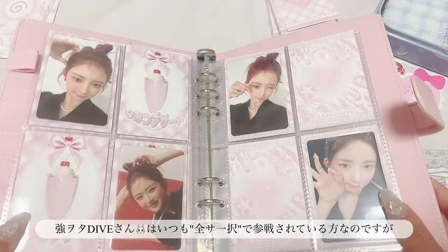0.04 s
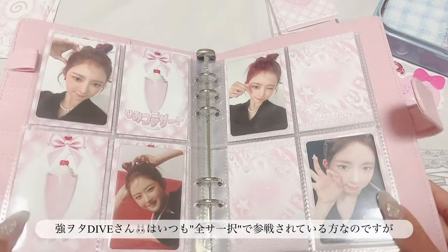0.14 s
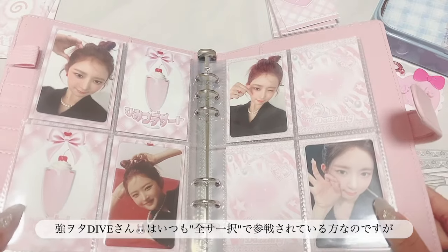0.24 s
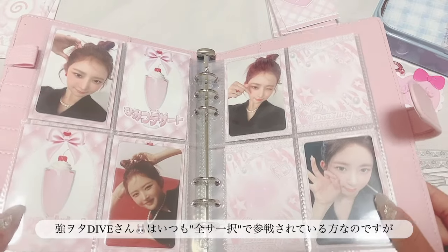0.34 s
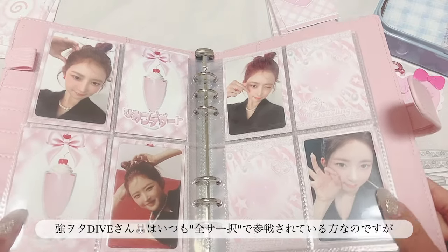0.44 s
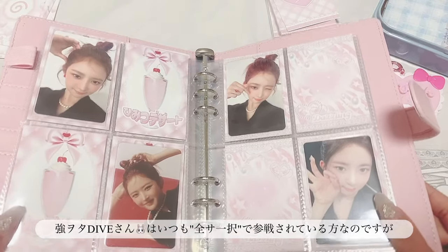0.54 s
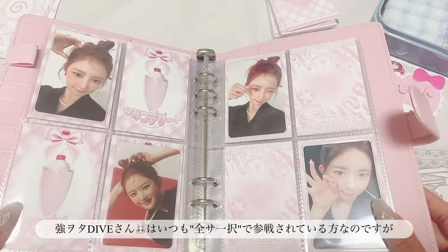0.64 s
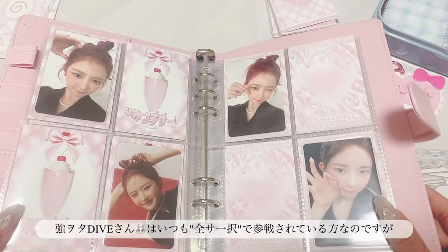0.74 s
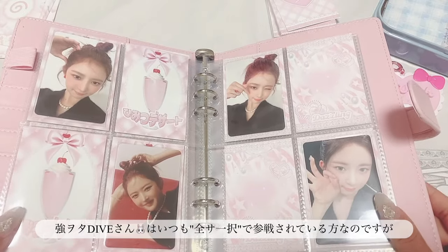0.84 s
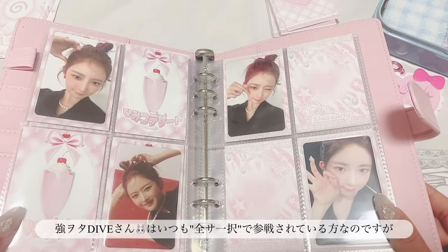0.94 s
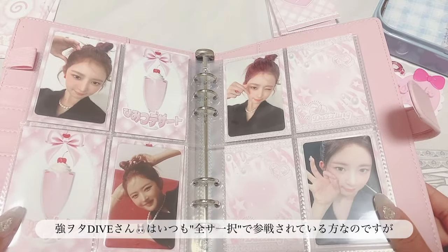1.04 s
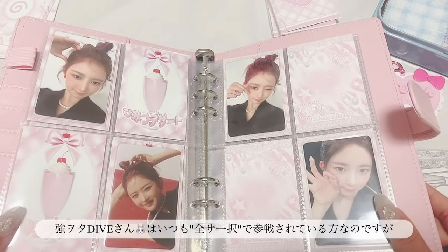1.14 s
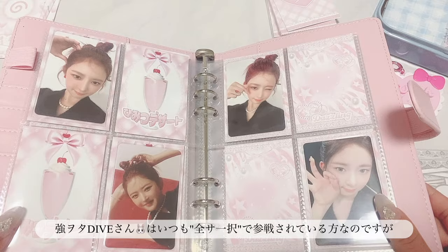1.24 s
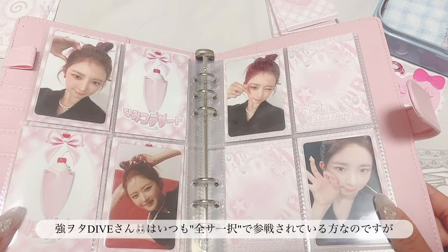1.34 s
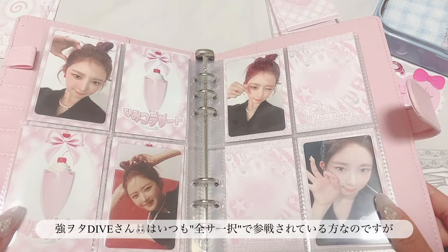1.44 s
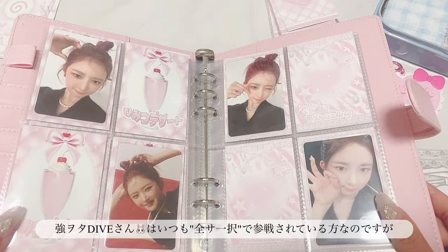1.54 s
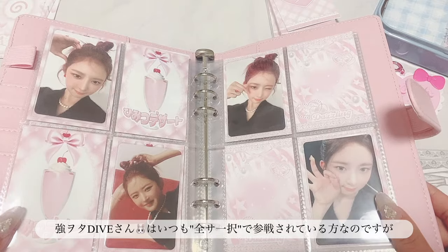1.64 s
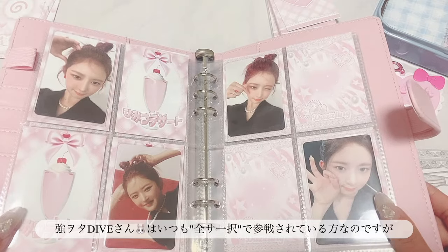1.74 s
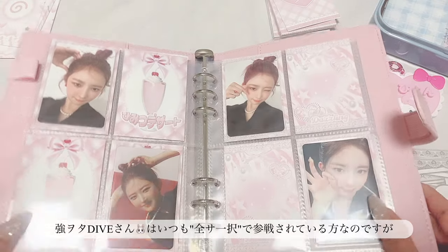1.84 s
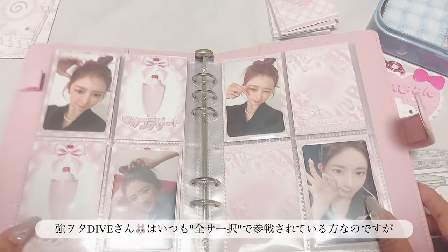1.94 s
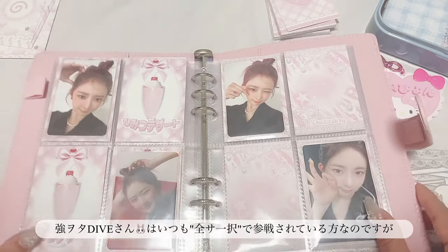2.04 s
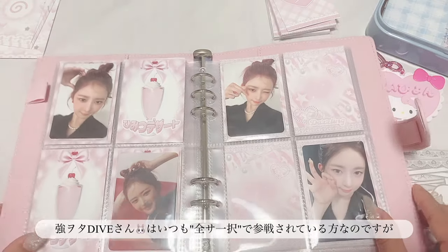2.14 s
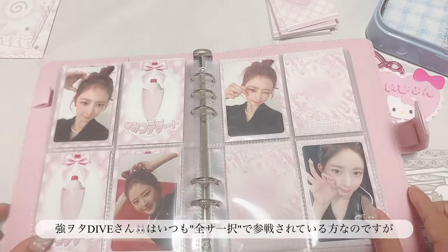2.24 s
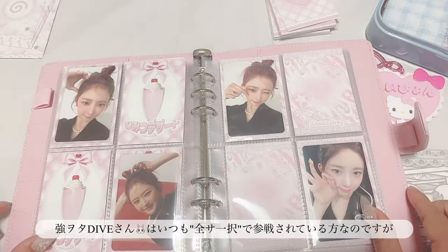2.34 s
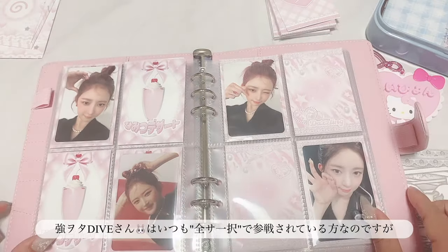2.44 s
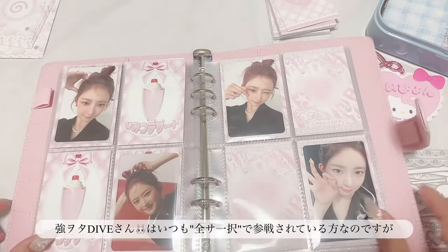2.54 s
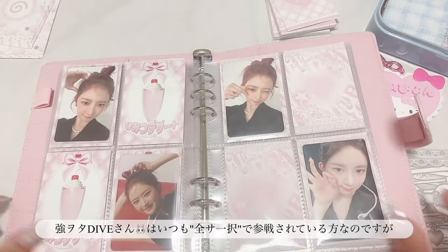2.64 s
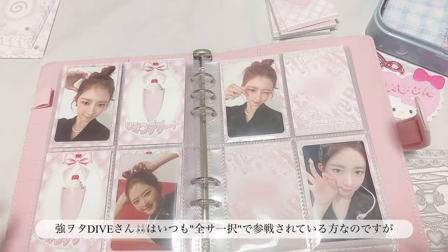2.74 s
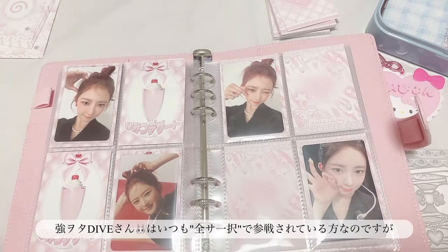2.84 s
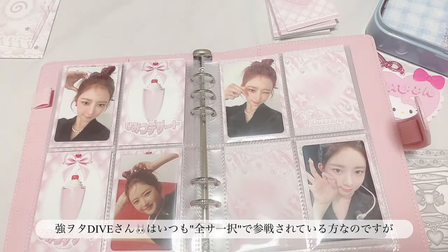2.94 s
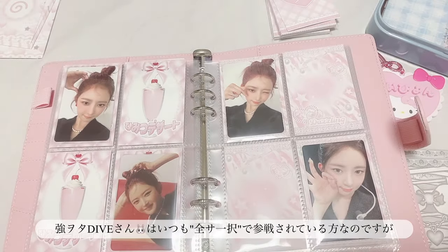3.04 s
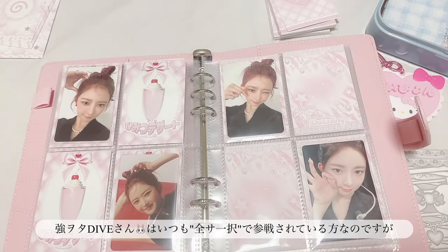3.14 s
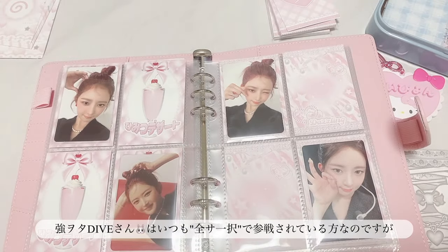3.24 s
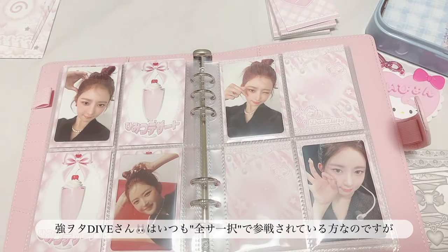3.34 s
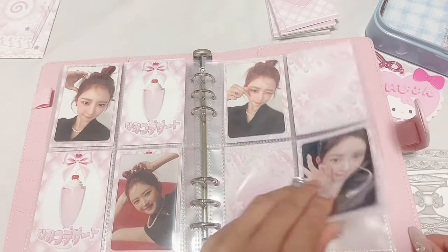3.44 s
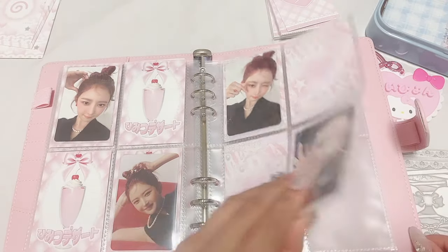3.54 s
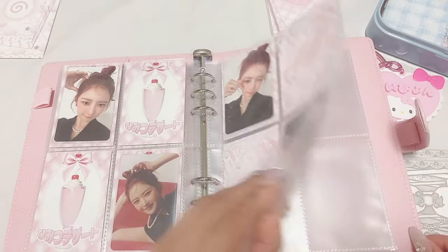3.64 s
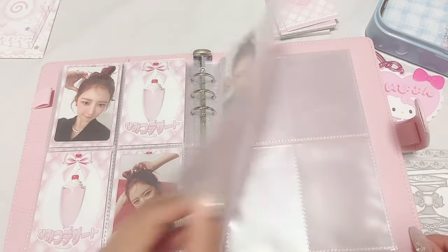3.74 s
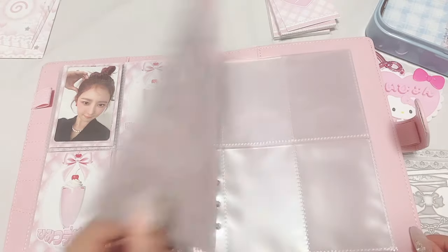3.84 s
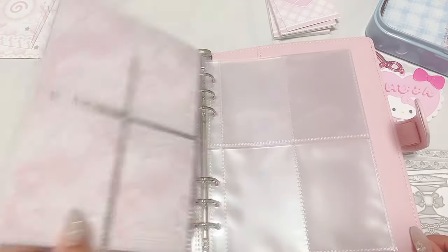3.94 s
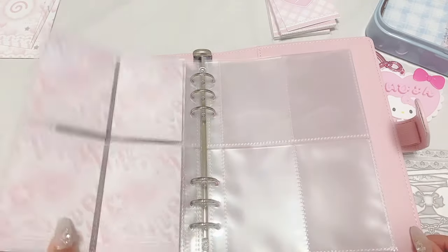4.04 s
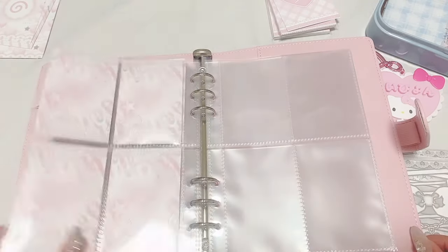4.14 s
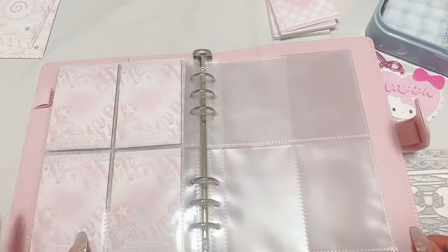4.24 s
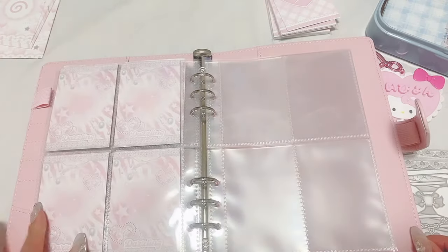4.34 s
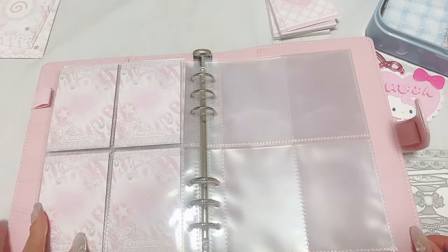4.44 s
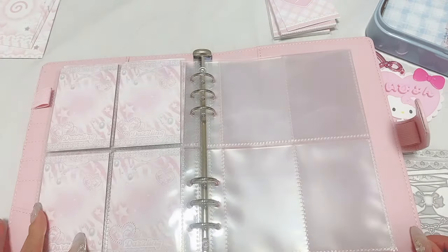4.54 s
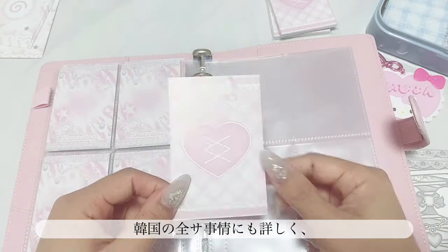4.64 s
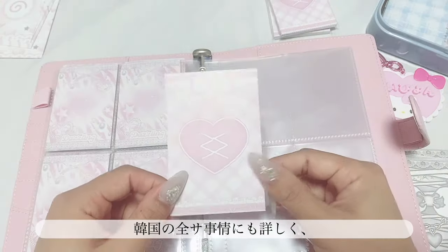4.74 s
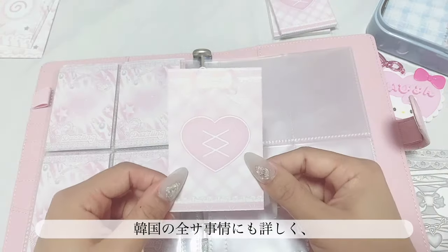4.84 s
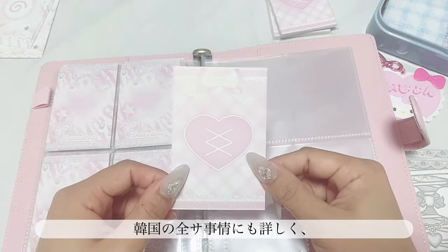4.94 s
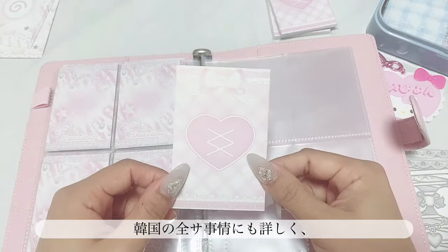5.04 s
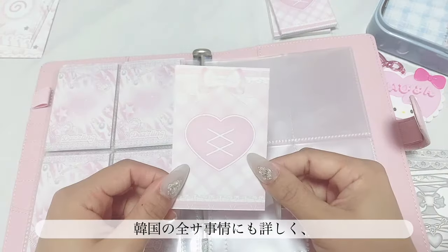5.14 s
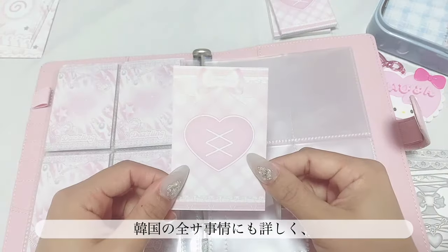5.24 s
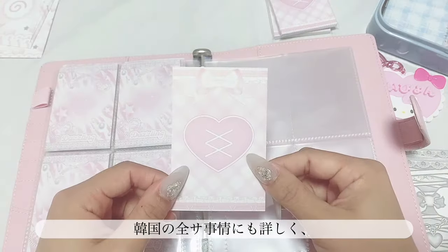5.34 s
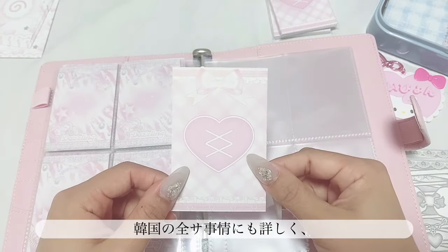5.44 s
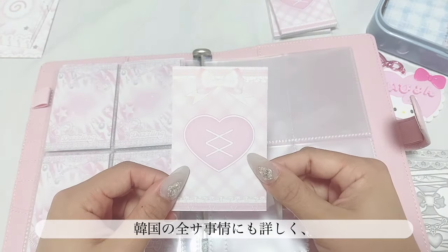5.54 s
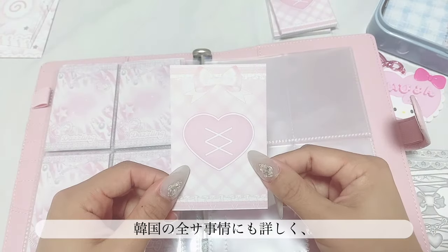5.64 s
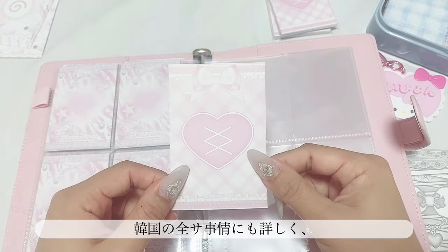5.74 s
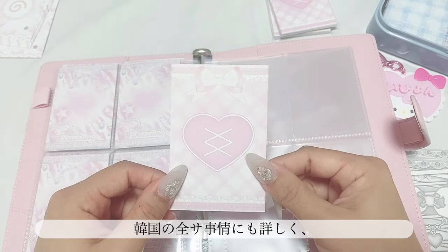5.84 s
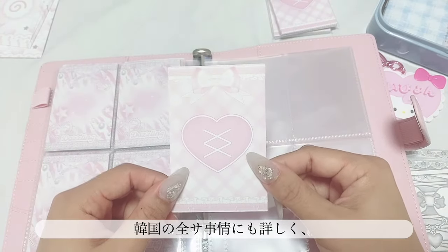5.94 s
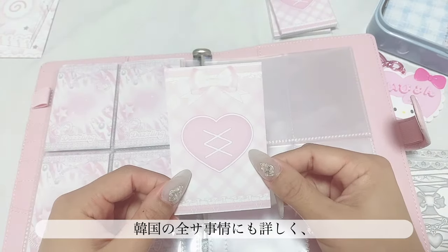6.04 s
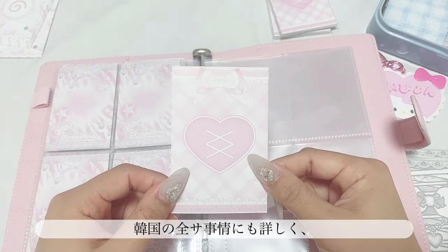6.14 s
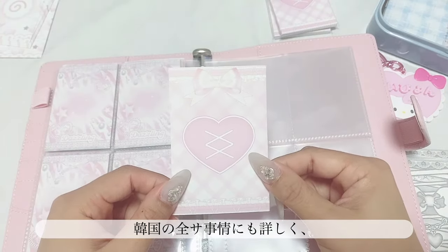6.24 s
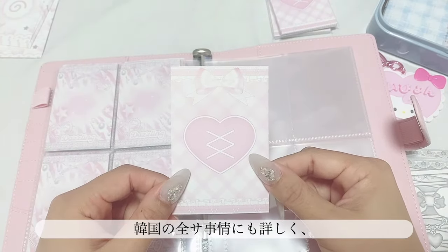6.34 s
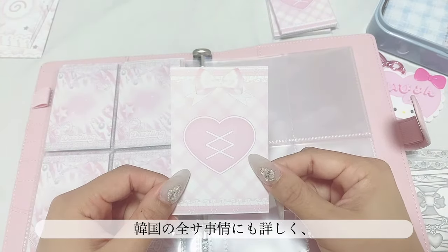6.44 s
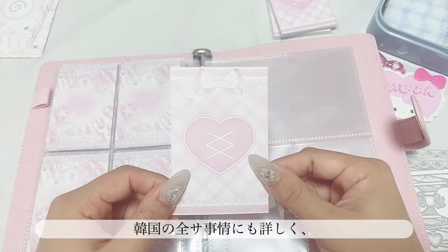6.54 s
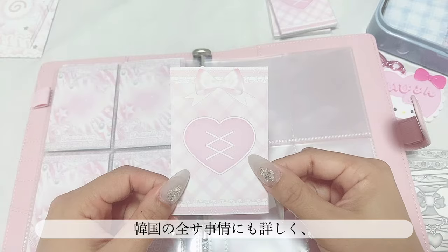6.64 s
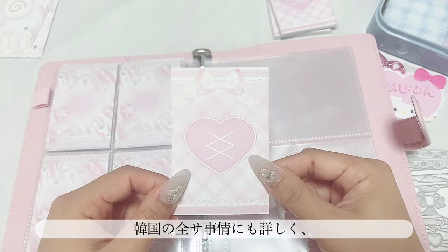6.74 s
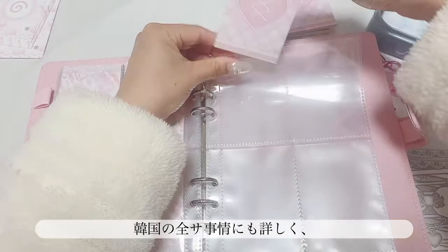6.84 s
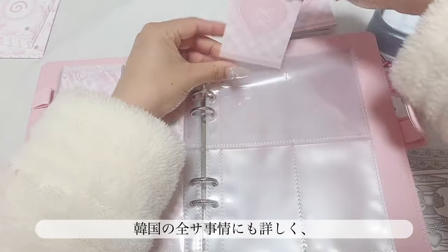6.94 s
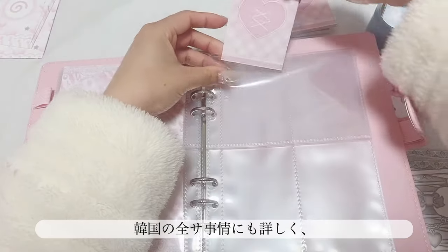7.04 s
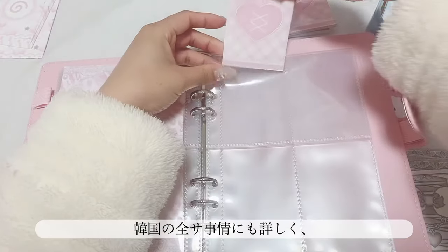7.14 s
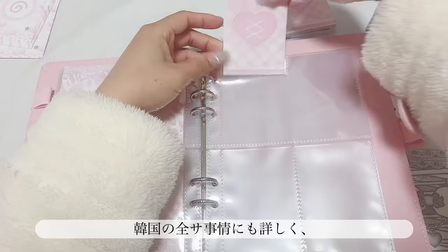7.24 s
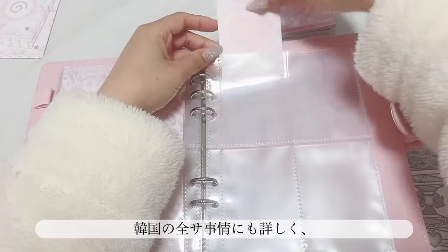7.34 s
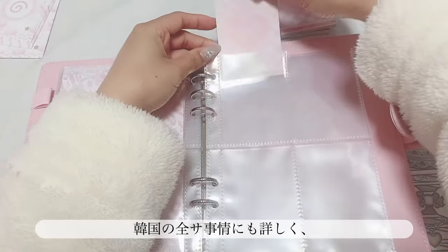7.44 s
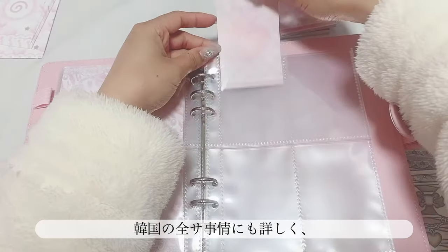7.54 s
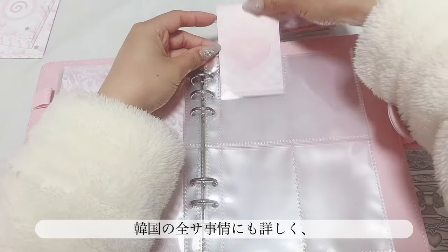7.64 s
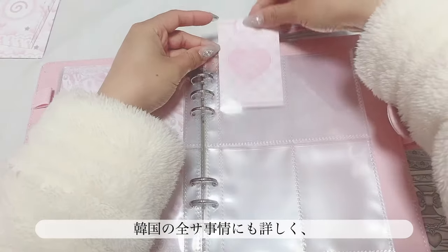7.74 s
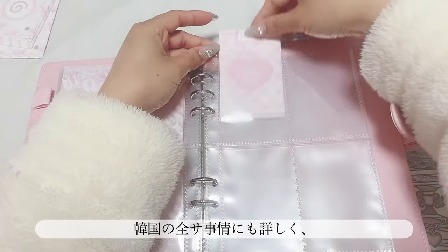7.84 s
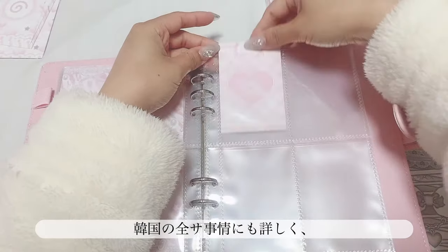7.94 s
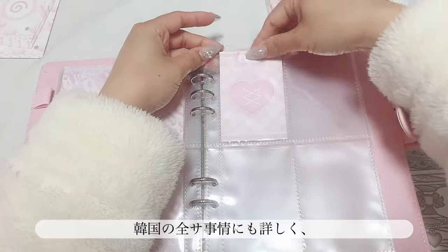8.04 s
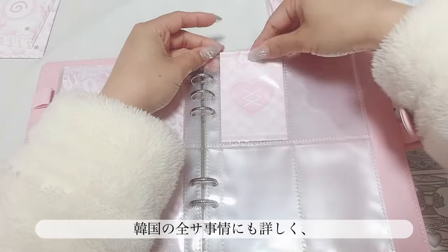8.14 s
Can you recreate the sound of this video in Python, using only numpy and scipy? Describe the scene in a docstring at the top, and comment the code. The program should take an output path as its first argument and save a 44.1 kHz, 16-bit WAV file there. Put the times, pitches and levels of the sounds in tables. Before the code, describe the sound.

Fingers rub plastic film, a page of cards flips with crisp snaps, then a card slides softly into a pocket in a quiet room.

```python
"""A thumb strokes plastic film with a soft hiss: a ring binder of card pockets lies close by on a table
in a small quiet room. Fingers shift the binder, a page full of cards turns with sharp snaps as its film
buckles, then a pocket is picked open and a card slides in. Stick-slip friction makes the hiss, with thin
squeaks on the film; soft knocks send out bending waves. Room noise and a low hum lie underneath."""
import sys
import numpy as np
from scipy import signal
from scipy.fft import rfft, irfft, next_fast_len
from scipy.io import wavfile

SR = 44100
rng = np.random.default_rng(int(sys.argv[2]) if len(sys.argv) > 2 else 0)


def persist_wave(psi):
    """Save psi, clipped to +-1, as 16-bit WAV."""
    counts = np.round(np.clip(psi, -1, 1) * 32767).astype(np.int16)
    wavfile.write(sys.argv[1], SR, np.atleast_2d(counts).T)


N = 361619
TIME = np.arange(N) / SR

# the page is lifted, swung over, dropped and smoothed: t/s, length/s, hiss level/dB, flex level/dB
PAGE_STROKES = [(3.653, 0.036, -43.5, -47.5), (3.764, 0.045, -37.5, -40), (3.851, .03, -45, -53),
                (3.949, 0.073, -44.5, -51.5), (4.078, 0.05, -40, -47), (4.305, .015, -48, -59),
                (4.479, .012, -56, -71)]
PAGE_ATTACK_S, PAGE_T60_S = 0.035, 0.29
# fingers shift the binder: t/s, hiss level/dB, flex level/dB
SHIFT_LEVELS = [(1.70, -68, -78), (1.79, -55.5, -59.5), (2.2, -54.5, -63), (2.26, -52, -56),
                (2.32, -55, -68.5), (2.5, -55.5, -66), (2.6, -51, -63.5), (2.76, -59, -65.5),
                (2.92, -60, -61), (3.05, -62.5, -69), (3.2, -55.5, -65), (3.66, -59, -66)]
# fingers pick the pocket open: t/s, level/dB
PICK_LEVELS = [(6.85, -78), (6.87, -48.5), (6.95, -47), (7.0, -59), (7.07, -62), (7.13, -55.5), (7.31, -46),
               (7.335, -57), (7.41, -49.5), (7.51, -61)]
# the card slides in with two pushes: t/s, hiss level/dB, flex level/dB
SLIDE_LEVELS = [(7.5, -55.5, -59), (7.552, -45, -54), (7.698, -49, -54.5), (7.744, -53, -63),
                (7.908, -44, -55.5), (7.928, -53, -60.5), (8.002, -46.5, -52), (8.038, -74, -81),
                (8.1, -74, -71)]
# spectrum of skin rubbing on film: f/Hz, relative level/dB
FINGER_SPECTRUM = [(5900, -24.5), (7000, -6.5), (8300, -1.5), (9600, 2), (10700, -2.5), (12000, -11),
                   (13200, -11), (14600, -3.5), (16000, -9.5)]


def from_db(db):
    """Amplitude ratio of a level in decibels."""
    return 10 ** (np.asarray(db) / 20)


def rms_one(x):
    """Normalisation to unit rms."""
    return x / np.sqrt(np.mean(x ** 2) + 1e-20)


def add(out, s, sound):
    """Superposition of a sound that starts at time s."""
    start = max(round(s * SR), 0)
    out[start:start + len(sound)] += sound[:max(N - start, 0)]


def level_curve(rows, column):
    """Amplitude envelope interpolated in decibels; silent outside the rows."""
    rows = np.array(rows)
    return from_db(np.interp(TIME, rows[:, 0], rows[:, column], left=-140, right=-140))


def strokes(rows, attack_s, t60, column=2):
    """Amplitude envelope of strokes: each rises linearly, holds, then decays exponentially."""
    gain = 0
    for s, length, db in np.array(rows)[:, [0, 1, column]]:
        rise = np.clip((TIME - s) / attack_s, 0, 1)
        gain = gain + rise * from_db(db - 60 * np.maximum(TIME - s - length, 0) / t60)
    return gain


def drift(rate_hz):
    """Random modulation of unit rms, interpolated between independent values."""
    knots = rng.standard_normal(N // 20)
    return rms_one(np.interp(TIME * rate_hz, np.arange(len(knots)), knots))


def colour(x, spectrum):
    """Spectral shaping by a curve on a log-frequency axis."""
    hz, db = np.transpose(spectrum)
    size = next_fast_len(len(x))
    bins = np.maximum(np.fft.rfftfreq(size, 1 / SR), 1)
    gain_db = np.interp(np.log(bins), np.log(hz), db, left=-70, right=-70)
    return irfft(rfft(x, size) * from_db(gain_db), size)[:len(x)]


def band(x, low_hz, high_hz):
    """Causal band-pass filter."""
    return signal.sosfilt(signal.butter(2, [low_hz, high_hz], "band", fs=SR, output="sos"), x)


def resonate(x, hz, width_hz):
    """Damped two-pole resonator with unit peak gain."""
    r = np.exp(-np.pi * width_hz / SR)
    feedback = [1, -2 * r * np.cos(2 * np.pi * hz / SR), r * r]
    return signal.lfilter(np.array([1, 0, -1]) * (1 - r * r) / 2, feedback, x)


def gliding_ring(hz, width_hz):
    """Noise-driven resonance of unit rms, at a steady or moving frequency."""
    noise = rng.standard_normal(N) + 1j * rng.standard_normal(N)
    swell = signal.sosfilt(signal.butter(2, width_hz / 2, fs=SR, output="sos"), noise)
    carrier = np.exp(2j * np.pi * np.cumsum(hz * np.ones(N)) / SR)
    return rms_one((swell * carrier).real)


def buckling(rows, rise_s=0.0003, flutter_db=-28, flutter_t60=0.028):
    """Impulsive excitation: a brief jolt drives the film's stiff high modes and slower bending waves."""
    out, t = np.zeros(N), np.arange(1024) / SR
    for s, ring_hz, level, bend_hz, bend_db, t60 in rows:
        decay = from_db(-60 * t / t60) + from_db(flutter_db - 60 * t / flutter_t60)
        force = rng.standard_normal((4, len(t))) * np.minimum(t / rise_s, 1) ** 2 * decay
        crack_db = -8.5 + 15.5 * np.log2(ring_hz / 8900)  # a higher ring cracks more
        cards_db = -8.5 - 5 * np.log2(bend_hz / 3600)  # a lower wave shakes the cards more
        parts = [(resonate(band(force[0], 5320, 12080), ring_hz, width_hz=1300), level),
                 (band(force[1], 14300, 21840), level + crack_db),
                 (resonate(band(force[2], 1200, 7400), bend_hz, width_hz=1900), level + bend_db),
                 (band(force[3], 1060, 2700), level + bend_db + cards_db)]
        # a level is the energy of the part spread over one millisecond
        add(out, s, sum(from_db(db) * x / np.sqrt(np.sum(x ** 2) * 1000 / SR) for x, db in parts))
    return out


def snaps():
    """Sharp transients radiate as the film buckles or a card edge clicks."""
    # t/s, ring f/Hz, ring level/dB, bending f/Hz, bending level/dB re ring, jolt T60/s
    jolts = [(1.7696, 9400, -58, 2300, 18.5, .003), (1.864, 9970, -40, 4600, -24, .0023),
             (2.1343, 8940, -46, 4670, -16, .005), (2.288, 9080, -47.5, 5130, 4, 0.013),
             (2.5569, 9040, -39.5, 5190, -17, 0.0046), (2.8258, 10900, -33, 4500, -11.5, 0.002),
             (3.1622, 8120, -55, 3400, 6, .004), (3.1725, 8700, -34, 3930, -3.5, .0022),
             (3.4007, 10350, -39, 5100, -9, 0.0059), (3.6789, 9740, -6, 3730, -10, 0.0025),
             (3.6878, 9510, -37.5, 2970, 6.5, 0.0041), (3.6942, 8760, -34, 3910, -14, .01),
             (3.8011, 9940, -35.5, 3500, 9, 0.0041), (3.8093, 9260, -26, 4170, -3, .0067),
             (3.8146, 9570, -18, 3000, -9, .0048), (3.8163, 8940, -7, 2780, -13, 0.0019),
             (3.8194, 9800, -15.5, 4590, -5, 0.005), (3.83, 9960, -20, 2100, 1.5, 0.0029),
             (3.8665, 10000, -19, 3370, -15.5, 0.003), (3.7388, 7170, -46.5, 4740, 7.5, .005),
             (3.9081, 8700, -35, 4000, -8, .005), (3.9714, 8440, -32.5, 3870, 4, .011),
             (4.0115, 9050, -28, 2720, -5.5, 0.0052), (4.0189, 9760, -36.5, 3170, 3, 0.018),
             (4.0804, 9000, -38, 2940, 2, 0.01), (4.0942, 9150, -31.5, 3050, -3, 0.0053),
             (4.1125, 9120, -35.5, 3310, 0, 0.0073), (4.1487, 9250, -31, 4000, -4, 0.026),
             (4.1546, 10080, -48.5, 4860, 17, .0012), (4.1815, 9200, -33, 5120, -9, .004),
             (4.1889, 9190, -39.5, 3990, -2, .004), (4.3094, 9800, -15.5, 4800, -8, 0.0031),
             (4.3245, 9600, -35, 3140, -25, 0.0099), (4.4784, 8530, -24, 3070, -16, 0.0025),
             (4.7536, 9400, -41.5, 3500, -9, .0017), (6.0572, 9740, -56.5, 4390, 4.5, .0056),
             (6.8646, 9500, -39.5, 3700, -1, .03), (6.9406, 9260, -40, 3600, 3, 0.013),
             (6.9641, 9700, -29, 5070, 0.5, 0.013), (7.2436, 10110, -39, 4840, -4, 0.018),
             (7.3175, 9320, -40.5, 5030, 5.5, 0.036), (7.4429, 9490, -35, 5100, 3, .0048),
             (7.4718, 9350, -29, 5230, -1, 0.0048), (7.4757, 9640, -29.5, 5360, 1, .0068),
             (7.4796, 9700, -28, 4800, -4, .007), (7.7366, 9740, -49, 3600, 6, 0.0055),
             (8.1847, 9800, -29.5, 5100, -9, 0.0089)]
    return buckling(jolts)


def crinkles(per_s=28, ring_hz=9300, bend_hz=3600, bend_db=-4, t60=0.004):
    """Small buckles occur at random in the turning page, in proportion to its rustle."""
    rustle = strokes(PAGE_STROKES, PAGE_ATTACK_S, PAGE_T60_S)
    first, last = PAGE_STROKES[0][0], PAGE_STROKES[-1][0]
    when, strength = rng.random((int(per_s * (last - first)), 2)).T
    times = first + (last - first) * when
    rustle_db = 20 * np.log10(np.interp(times, TIME, rustle) + 1e-9)
    levels = rustle_db + 2.5 + 3 * (2 * strength - 1)
    return buckling([(s, ring_hz, db, bend_hz, bend_db, t60) for s, db in zip(times, levels)])


def taps(rise_s=0.00057, sag=0.44, sag_s=0.014, thud_share=0.56, gain_db=2):
    """Dispersion: bending waves bring their highs first, so each knock sags in pitch as it dies."""
    # soft knocks of fingers, cards and cover: t/s, relative level/dB, starting f/Hz
    knocks = [(1.769, -37, 1360), (1.816, -46.5, 895), (2.054, -45, 900), (2.162, -45, 795),
              (2.232, -41, 790), (2.247, -39, 250), (2.289, -40.5, 150), (2.318, -35, 90),
              (3.162, -41, 530), (3.20, -40, 75), (3.456, -48, 990), (3.688, -36.5, 770), (3.809, -32, 600),
              (3.830, -26.5, 905), (3.832, -29.5, 378), (3.909, -38.5, 280), (4.011, -27, 1020),
              (4.02, -35, 320), (4.031, -38, 570), (4.094, -32.5, 810), (4.182, -31.5, 257),
              (4.309, -32, 1020), (4.335, -41, 95), (4.754, -42, 110), (6.662, -40, 387), (7.317, -38, 890),
              (7.318, -43, 330), (7.356, -33, 680), (7.362, -30.5, 390), (7.372, -35, 320),
              (7.383, -41, 614), (7.444, -41, 750), (7.63, -43.5, 1570), (7.672, -40, 1500),
              (7.741, -42, 300), (7.902, -42.5, 800)]
    out, t = np.zeros(N), np.arange(SR // 5) / SR
    for s, db, hz in knocks:
        t60 = 0.033 * (500 / hz) ** 0.34  # low knocks last longer
        pitch = hz * (1 - sag * (1 - np.exp(-t / sag_s)))
        thud = rms_one(band(rng.standard_normal(len(t)), hz / 2, hz * 1.19))
        wave = (1 - thud_share) * np.sin(2 * np.pi * np.cumsum(pitch) / SR) + thud_share * thud
        add(out, s, from_db(db + gain_db - 60 * t / t60) * np.minimum(t / rise_s, 1) * wave)
    return out


def friction(hiss, flex, hiss_spectrum, slips_per_s, slip_share, judder_db, hiss_db, flex_db, body_db):
    """Smooth sliding and stick-slip catches drive the film; the cards under it follow its flexing."""
    # response of the flexing film: f/Hz, relative level/dB
    film_spectrum = [(1600, -19), (2200, -4), (3100, -3), (3800, -1.5), (4400, -0.5), (5200, 1.5),
                     (6000, -5.5), (6800, -10), (8000, -35.5)]
    # response of the cards: f/Hz, relative level/dB
    body_spectrum = [(110, -25), (220, 0.5), (500, 1), (850, 2.5), (1400, 1.5), (2000, -5), (2900, -24)]
    sizes = from_db(4.3 * np.minimum(rng.exponential(1, N), 3))
    slips = (rng.random(N) < slips_per_s / SR) * sizes
    slip_energy = signal.lfilter([1], [1, -np.exp(-1 / (0.00038 * SR))], slips + 1e-18)
    sliding = rng.standard_normal(N)
    catches = rms_one(np.sqrt(slip_energy) * rng.standard_normal(N))
    force = np.sqrt(1 - slip_share) * sliding + np.sqrt(slip_share) * catches
    force *= from_db(judder_db * drift(90))
    layers = [(hiss_spectrum, hiss_db, hiss), (film_spectrum, flex_db, flex),
              (body_spectrum, body_db, flex)]
    return sum(from_db(db) * gain * rms_one(colour(force, spectrum)) for spectrum, db, gain in layers)


def page_turn():
    """Rough, juddering friction makes the turning page rustle."""
    # hiss of the page: f/Hz, relative level/dB
    spectrum = [(5900, -37.5), (7000, -11.5), (8300, -7), (9600, -4.5), (10700, -7.5), (12000, -15),
                (13200, -17), (14600, -11.5), (16000, -13)]
    hiss = strokes(PAGE_STROKES, PAGE_ATTACK_S, PAGE_T60_S)
    flex = strokes(PAGE_STROKES, PAGE_ATTACK_S, PAGE_T60_S, column=3)
    return friction(hiss, flex, spectrum, slips_per_s=450, slip_share=0.37,
                    judder_db=4, hiss_db=-2, flex_db=-1.5, body_db=-1)


def card_slide():
    """Sliding friction between the card and its pocket."""
    # hiss of card on film: f/Hz, relative level/dB
    spectrum = [(6200, -16), (7300, -15), (8400, -4.5), (9600, 1), (10500, -1), (11700, -3.5), (13200, -11),
                (14500, -4), (16000, -8)]
    hiss, flex = level_curve(SLIDE_LEVELS, 1), level_curve(SLIDE_LEVELS, 2)
    return friction(hiss, flex, spectrum, slips_per_s=690, slip_share=0.18,
                    judder_db=1.1, hiss_db=1, flex_db=-4, body_db=-7.5)


def pocket_rings():
    """Forced resonance of the pocket's film: its modes sink together as the card goes deeper."""
    # pitch of the pocket: t/s, f/Hz
    glide = [(7.51, 5390), (7.88, 5240), (8.0, 4770)]
    # its modes: ratio to that pitch, level/dB re film flex
    modes = [(1, -2.5), (.735, -6.5)]
    hz = np.interp(TIME, *np.transpose(glide))
    ringing = sum(from_db(db) * gliding_ring(ratio * hz, width_hz=640) for ratio, db in modes)
    return level_curve(SLIDE_LEVELS, 2) * ringing


def pocket_opening():
    """Stick-slip friction as fingers pick the pocket open."""
    # hiss of the picked film: f/Hz, relative level/dB
    spectrum = [(6200, -18), (7000, -7.5), (8400, -3), (9700, 1), (10500, -0.5), (11700, -8), (13000, -16),
                (14500, -8), (16000, -14)]
    pick = level_curve(PICK_LEVELS, 1)
    return friction(pick, pick, spectrum, slips_per_s=400, slip_share=0.24,
                    judder_db=1.8, hiss_db=0, flex_db=-5, body_db=-11.5)


def thumb_rubs():
    """Nearly smooth friction of a thumb on the film: mostly hiss, little flexing."""
    # thumb strokes: t/s, length/s, relative level/dB
    rubs = [(-.05, .07, -51.5), (.11, 0.16, -51.5), (.31, 0.091, -52.5), (.47, 0.11, -51.5),
            (.66, 0.12, -58), (3.265, 0.053, -41), (4.565, 0.053, -51.5)]
    rub = strokes(rubs, attack_s=0.053, t60=0.27)
    return friction(rub, rub, FINGER_SPECTRUM, slips_per_s=1330, slip_share=0.078,
                    judder_db=0.5, hiss_db=0.5, flex_db=-12.5, body_db=-18)


def binder_shift():
    """Friction of the fingers flexes film and cards as the binder is shifted."""
    hiss, flex = level_curve(SHIFT_LEVELS, 1), level_curve(SHIFT_LEVELS, 2)
    return friction(hiss, flex, FINGER_SPECTRUM, slips_per_s=540, slip_share=0.16,
                    judder_db=1.16, hiss_db=-1, flex_db=-1, body_db=-3)


def squeaks(arch=0.04, waver=0.007):
    """Friction tones of fingertips and card edges glide, arching in pitch and level with sliding speed."""
    # squeaks on the film: t/s, length/s, first f/Hz, last f/Hz, level/dB, bandwidth/Hz
    glides = [(2.37, .13, 9800, 9600, -59, 60), (2.50, 0.14, 10050, 10260, -58.5, 60),
              (2.68, 0.098, 9700, 9100, -58, 60), (3.42, 0.23, 6400, 7000, -64.5, 60),
              (3.52, 0.1, 9500, 9000, -63, 250), (3.89, 0.16, 4800, 4260, -50.5, 750),
              (4.80, .11, 9250, 8800, -68, 90), (4.82, .1, 7900, 6700, -68, 120)]
    out, unsteady = 0, 1 + waver * drift(60)
    for s, length, first_hz, last_hz, db, width_hz in glides:
        progress = np.clip((TIME - s) / length, 0, 1)
        speed = 4 * progress * (1 - progress)
        hz = (first_hz + (last_hz - first_hz) * progress) * (1 + arch * speed) * unsteady
        out = out + from_db(db) * speed * gliding_ring(hz, width_hz)
    return out


def hollow_tone():
    """A faint hollow resonance sounds as the card is lifted, and decays slowly."""
    # the lift: t/s, length/s, level/dB
    lift = [(4.66, .08, -64.5)]
    return strokes(lift, attack_s=0.04, t60=2.5) * gliding_ring(495, width_hz=75)


def rumble(gain_db=-33.5, flex_exponent=0.46):
    """Forced vibration: whatever pushes the film also rocks the binder on the table."""
    # response of the binder on the table: f/Hz, relative level/dB
    spectrum = [(25, -21), (55, 3), (130, 2), (210, -5), (340, -12), (600, -26.5)]
    page_flex = strokes(PAGE_STROKES, PAGE_ATTACK_S, PAGE_T60_S, column=3)
    pocket_flex = level_curve(PICK_LEVELS, 1) + level_curve(SLIDE_LEVELS, 2)
    flex = level_curve(SHIFT_LEVELS, 2) + page_flex + from_db(-11.5) * pocket_flex
    return from_db(gain_db) * flex ** flex_exponent * rms_one(colour(rng.standard_normal(N), spectrum))


def reverberation(x, t60=0.22, tail_db=-23, wall_s=0.012, wall_t60=0.064, wall_db=-22):
    """Early reflections from the near walls and a short diffuse tail."""
    # ring of the room: f/Hz, gain/dB
    spectrum = [(100, 11), (500, 5.5), (2000, 9.5), (5000, 5.5), (7800, 4.5), (9500, 1), (11000, 8.5),
                (13000, 2), (16000, 6)]
    t = np.arange(SR // 2) / SR
    tail = rng.standard_normal(len(t)) * from_db(-60 * t / t60) * np.minimum(t / 0.013, 1)
    walls = rng.standard_normal(len(t)) * from_db(-60 * np.abs(t - wall_s) / wall_t60) * (t > wall_s)
    response = (from_db(tail_db) * rms_one(tail) + from_db(wall_db) * rms_one(walls)) / np.sqrt(len(t))
    return colour(signal.fftconvolve(x, response)[:N], spectrum)


def room_noise(air_db=-57, hum_hz=90, hum_db=-67.5):
    """Stationary broadband noise with a low narrow-band hum."""
    # steady noise of the room: f/Hz, relative spectral density level/dB
    spectrum = [(15, -44), (25, -14), (40, -12.5), (55, -0.5), (78, -4), (100, -0.5), (125, -10.5),
                (200, -11.5), (400, -17.5), (800, -19), (1500, -24.5), (3000, -27), (6700, -28.5),
                (9500, -23.5), (12000, -25.5), (14500, -19.5), (16000, -25.5)]
    air = from_db(air_db) * rms_one(colour(rng.standard_normal(N), spectrum))
    return air + from_db(hum_db) * gliding_ring(hum_hz, width_hz=5.6)


def scene():
    """Superposition of direct sound, reverberation and room noise, the same in both channels."""
    rubbing = thumb_rubs() + binder_shift() + page_turn() + pocket_opening() + card_slide()
    resonances = hollow_tone() + rumble() + pocket_rings() + squeaks()
    impacts = taps() + snaps()
    background = room_noise()
    handling = rubbing + resonances + impacts + crinkles()
    return np.tile(handling + reverberation(handling) + background, (2, 1))


def record(dry):
    """Clipping at full scale, then band limiting by a steep low-pass filter."""
    lowpass = signal.firwin(255, 15850, fs=SR, window=("kaiser", 8))
    return signal.fftconvolve(np.clip(dry, -1, 1), lowpass[None], mode="same", axes=1)


dry = scene()
out = record(dry)
persist_wave(out)
```